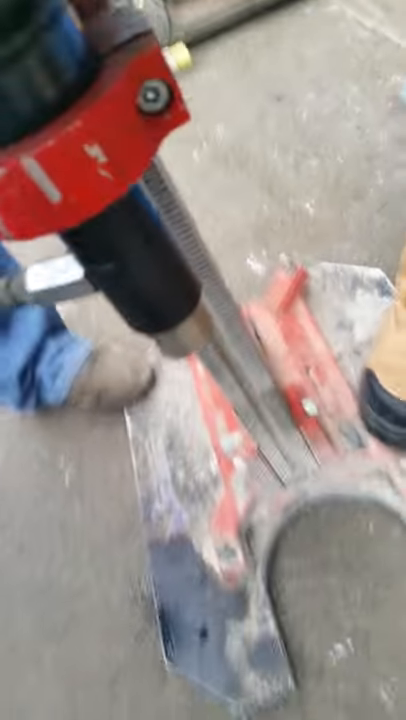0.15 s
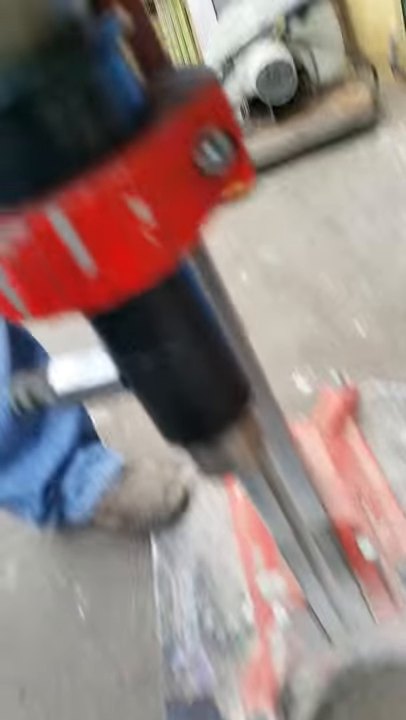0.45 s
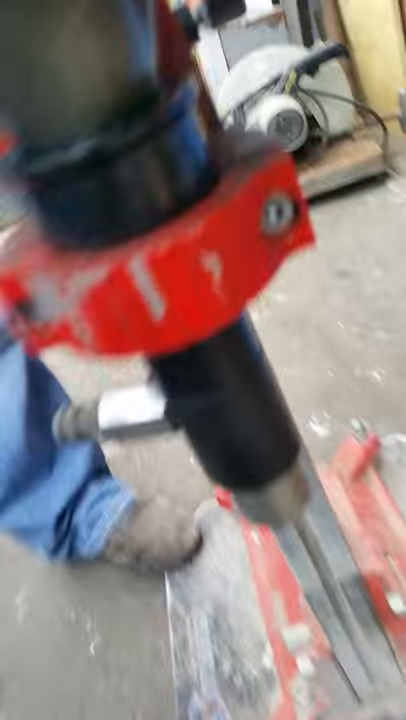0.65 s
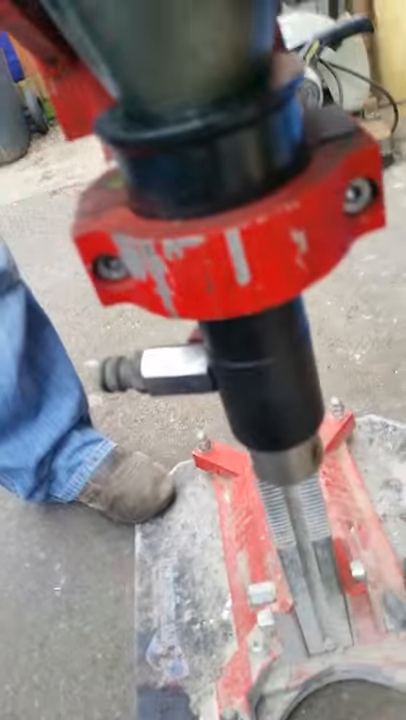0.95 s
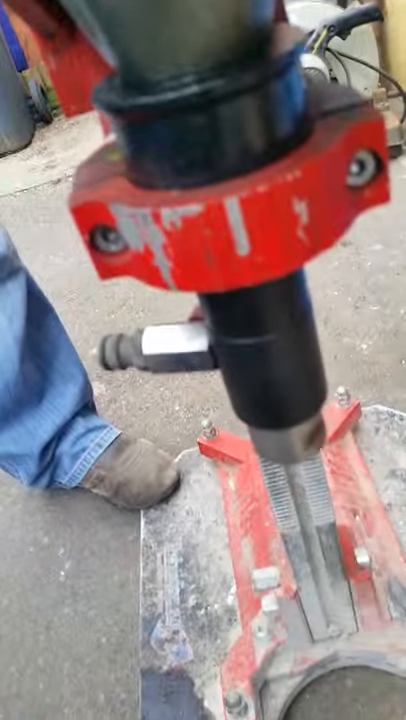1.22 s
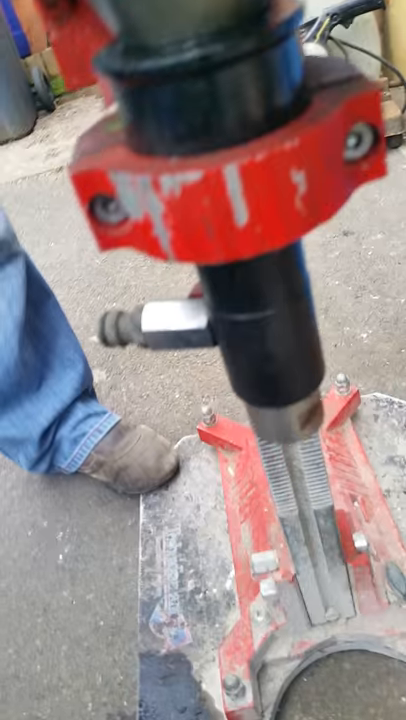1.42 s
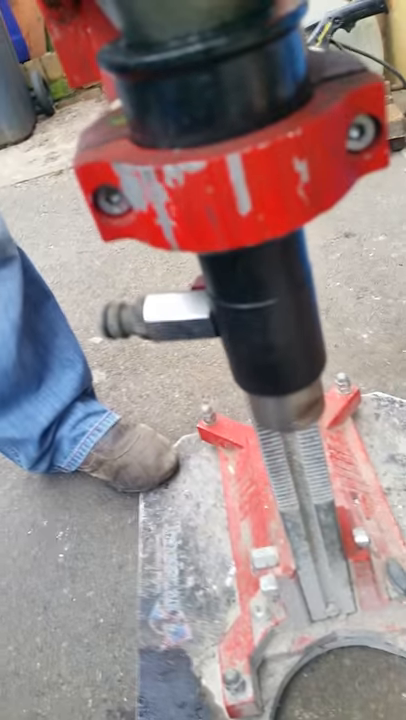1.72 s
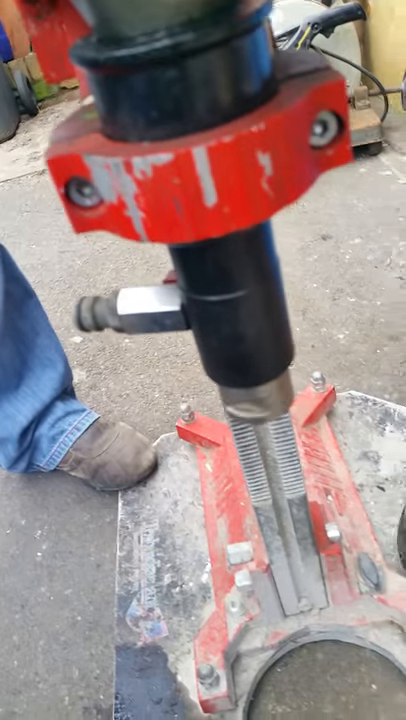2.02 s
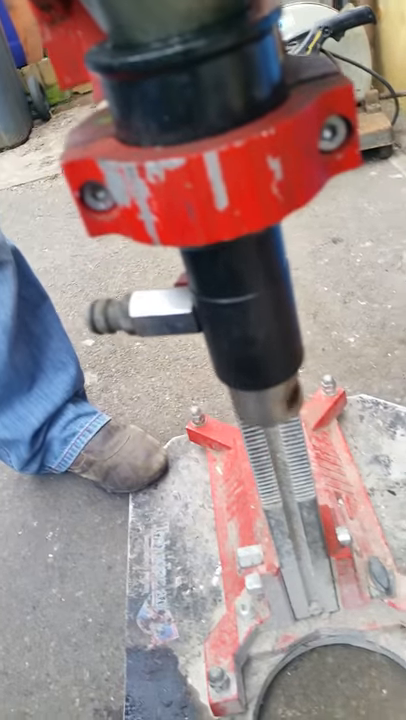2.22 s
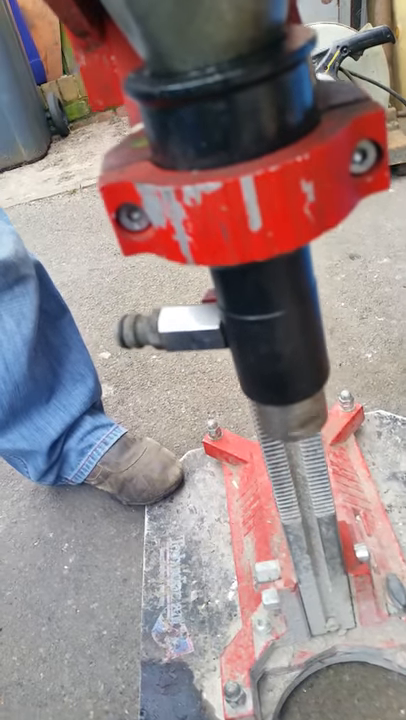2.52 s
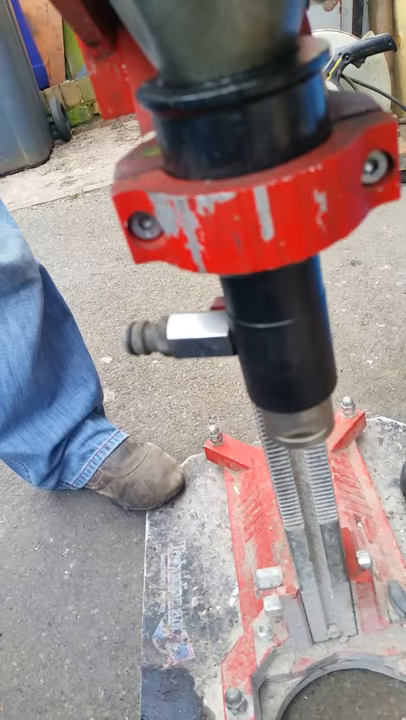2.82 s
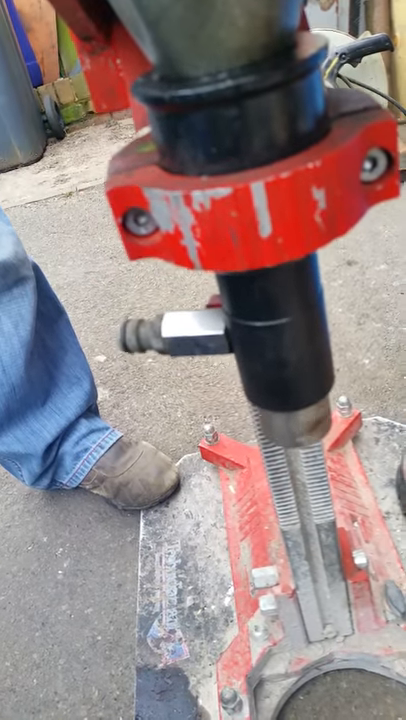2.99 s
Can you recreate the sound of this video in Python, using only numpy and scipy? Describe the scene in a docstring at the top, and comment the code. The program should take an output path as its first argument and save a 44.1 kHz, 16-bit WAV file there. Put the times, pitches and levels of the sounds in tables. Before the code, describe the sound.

A small two-stroke petrol engine on a core drill stand idles close by outdoors on pavement, rough and rapid. Loose steel chatters and knocks in the first second, then the idle smooths and speeds up.

```python
"""A small two-stroke petrol engine idles on the stand of a core drill, close by, outdoors on pavement.
Most firings come two to four turns apart: each thumps, cracks and hisses; the turns between puff through the silencer.
In the first second the shaking makes loose steel on the stand chatter most, with hard knocks that ring its modes.
Near 1.5 s the spindle sings narrowly; from 1.7 s the idle speeds up, and the chatter then sinks.
Gas pushes ring the silencer filter, shaped noise makes the hiss, and random taps excite the steel."""
import sys
import numpy as np
from scipy import signal
from scipy.fft import rfft, irfft
from scipy.io import wavfile
from scipy.ndimage import uniform_filter1d

SR = 44100
rng = np.random.default_rng(int(sys.argv[2]) if len(sys.argv) > 2 else 0)


def master(y):
    """Save y as 16-bit WAV."""
    cut = np.clip(np.atleast_2d(y).T, -1, 1)
    pcm = np.round(cut * 32767)  # scale
    wavfile.write(sys.argv[1], SR, pcm.astype(np.int16))


N = 138915

# Firings of the engine. Each row: time in seconds, thump level in dB (before THUMP_DB),
# crack level in dB (before CRACK_DB).
FIRINGS = [(0.0177, -15.0, -20.0), (0.0768, -15.0, -20.0), (0.1357, -15.0, -19.0), (0.194, -16.0, -17.0),
           (0.2504, -18.0, -24.0), (0.3083, -15.0, -23.0), (0.3467, -14.0, -21.0), (0.3855, -15.0, -22.0),
           (0.405, -15.0, -14.0), (0.4432, -14.0, -21.0), (0.5011, -16.0, -20.0), (0.5392, -15.0, -16.0),
           (0.5769, -14.0, -23.0), (0.6336, -14.0, -23.0), (0.6525, -15.0, -16.0), (0.6902, -15.0, -26.0),
           (0.7288, -14.0, -19.0), (0.804, -13.0, -17.0), (0.8748, -17.0, -18.0), (0.9442, -19.0, -21.0),
           (0.9973, -21.0, -24.0), (1.0509, -19.0, -27.0), (1.1068, -18.0, -21.0), (1.1648, -19.0, -23.0),
           (1.2217, -19.0, -20.0), (1.2783, -17.0, -20.0), (1.3345, -19.0, -21.0), (1.3928, -18.0, -19.0),
           (1.4674, -17.0, -24.0), (1.524, -20.0, -21.0), (1.5809, -18.0, -22.0), (1.6371, -19.0, -21.0),
           (1.7126, -21.0, -21.0), (1.7688, -21.0, -24.0), (1.8059, -20.0, -22.0), (1.8589, -20.0, -23.0),
           (1.909, -18.0, -19.0), (1.9574, -18.0, -21.0), (2.005, -19.0, -21.0), (2.0517, -19.0, -20.0),
           (2.0988, -19.0, -22.0), (2.145, -19.0, -22.0), (2.1762, -17.0, -26.0), (2.2074, -18.0, -23.0),
           (2.2538, -15.0, -20.0), (2.2987, -17.0, -22.0), (2.329, -17.0, -21.0), (2.3738, -18.0, -19.0),
           (2.4176, -18.0, -22.0), (2.4627, -18.0, -18.0), (2.5076, -18.0, -22.0), (2.5538, -16.0, -22.0),
           (2.585, -17.0, -21.0), (2.6308, -18.0, -21.0), (2.6762, -19.0, -23.0), (2.7222, -17.0, -19.0),
           (2.7665, -16.0, -19.0), (2.8115, -15.0, -20.0), (2.8571, -17.0, -20.0), (2.9021, -16.0, -22.0),
           (2.9477, -17.0, -21.0), (2.9919, -16.0, -24.0), (3.022, -15.0, -26.0), (3.0668, -15.0, -23.0),
           (3.0966, -16.0, -25.0), (3.1423, -18.0, -20.0)]
# Crank speed. Each row: time in seconds, speed in turns per second.
CRANK_SPEED = [(0, 52), (.8, 55), (1.7, 53), (1.95, 62), (2.3, 66), (3.15, 67)]
# Strength of the unfired puffs. Each row: time in seconds, level in dB relative to PUFF_DB.
PUFF_LEVEL = [(0, 5.5), (.4, 7), (.85, 5.5), (1.15, 3), (1.7, 6), (2.1, 1.5), (2.7, 2.3), (3.15, 2.5)]
# Silencer response. Each row: frequency in Hz, gain in dB.
SILENCER = [(15, -66), (40, -7), (53, 4), (66, 10.5), (82, 4.5), (110, 2), (150, 2), (205, 3.5), (290, 1.5),
            (360, -4), (450, -1), (560, -0.5), (700, -4), (850, -6), (1100, -5), (1280, -23), (2000, -27.5),
            (6000, -51)]
# Echoes from the ground and the frame. Each row: delay in seconds, level in dB.
ECHOES = [(.0062, -18), (0.0109, -16.5)]
# Exhaust at the far (right) microphone against the near one. Each row: frequency in Hz, gain in dB.
FAR_MIC = [(60, -1), (150, -3.5), (250, -2.5), (380, 3.5), (520, -11), (700, 8), (950, 2), (1300, 8)]
# Colour of cracks and hiss at each microphone, before tilt. Each row: frequency in Hz, gain in dB.
HISS_LEFT = [(200, -6), (600, 3.5), (1000, -5), (1500, -0.5), (2500, -10.5), (3500, -6), (5800, -14.5),
             (7800, -9.5), (9200, -4.5), (10200, 4), (12200, -4.5), (14200, 1), (15700, -7)]
HISS_RIGHT = [(200, -2.5), (600, 4), (1000, 0.5), (1500, 2.5), (2500, -3), (3600, -1.5), (4700, 3.5),
              (5600, 3.5), (6400, 4), (7800, 2.5), (9200, 0), (10200, -3.5), (12800, -5), (15700, -3.5)]
# Treble gain of the cracks, above about 8.5 kHz. Each row: time in seconds, gain in dB.
CRACK_TREBLE = [(0, -4), (.85, -2), (1.1, 4), (1.9, 3), (3.15, 3)]
# Mechanical hiss, before shaking, grain and trim. Each row: time in seconds, level in dB.
WHIRR_LEVEL = [(0, -24.5), (.25, -26.5), (.45, -24.5), (.8, -23.5), (1, -28.5), (1.2, -30.5), (1.9, -30),
               (2.25, -28.5), (2.5, -30), (2.9, -29), (3.03, -25.5), (3.15, -29)]
# Extra colour of the mechanical hiss. Each row: frequency in Hz, gain in dB.
WHIRR_COLOUR = [(600, 2), (1200, 0), (2600, 1), (3500, -0.5), (5000, -0.5)]
# Ringing modes of two loose steel parts.
# Each row: frequency in Hz, t60 in seconds, left level in dB, right level in dB.
LOW_MODES = [(2693, 0.042, -8.5, -8.5), (4666, 0.031, -17.5, -3.5), (6194, 0.037, -9.5, 7),
             (6520, 0.028, -37, 6), (6840, 0.035, -32, 5), (7340, 0.037, -32, 2)]
HIGH_MODES = [(8650, 0.024, -21, -31), (10716, 0.035, 5.5, -3.5), (11230, .025, -23, -19),
              (11000, 0.017, -13, -16), (11670, .015, -6, -7)]
# Chatter of those parts, before CHATTER_TRIM_DB. Each row: time in seconds, level in dB.
LOW_CHATTER = [(0, -26), (.3, -30), (.48, -35), (.85, -29.5), (1.1, -39), (1.52, -32.5), (1.85, -33.5),
               (2.1, -43), (3.15, -37)]
HIGH_CHATTER = [(0, -30.5), (.28, -41), (.42, -28.5), (.65, -30), (.82, -27.5), (1, -43), (1.5, -43.5),
                (1.85, -35), (2.1, -47), (3.15, -40)]
# Hard knocks of the high-ringing and low-ringing part. Each row: time in seconds, level in dB.
HIGH_KNOCKS = [(.194, -15), (.4045, -9), (.539, -20), (.653, -11.5)]
LOW_KNOCKS = [(.442, -15.5), (.804, -16.5), (1.393, -24)]
# Ring of the spindle, before shaking. Each row: time in seconds, right-hand level in dB.
SING_LEVEL = [(0, -43), (.48, -25), (.6, -40), (.9, -32), (1.18, -37), (1.28, -24), (1.4, -45),
              (1.455, -12), (1.49, -33), (1.8, -32), (2.1, -50)]

# Exhaust: bangs, then puffs that come a little late in the turn
THUMP_DB, BANG_S = 36, 0.0004
PUFF_DB, PUFF_SCATTER_DB = 16.5, 0.7
PUFF_S, PUFF_EDGE_S, PUFF_LATE_S = 0.0022, 0.0002, 0.00054
# An unfired cylinder first sucks gas back; its level is relative to the puff
SUCK_DB, SUCK_LEAD_S, SUCK_S = -8.5, 0.00054, 0.00094
# Fresh charge sweeps the cylinder after each stroke; SWEEP_TURN is in turns
SWEEP_DB, SWEEP_TURN, SWEEP_S = -3, 0.15, 0.011
# The intake gulps air about half a turn after each stroke
INTAKE_DB, INTAKE_TURN, INTAKE_S, INTAKE_EDGE_S = 11.5, 0.561, 0.0017, 0.00027
TURN_JITTER_S = 0.0001
# Lags of the right microphone
THUMP_LAG_S, CRACK_LAG_S = 0.00047, 0.00041

CRACK_DB, CRACK_DELAY_S, CRACK_ATTACK_S, CRACK_DECAY_S = 2.5, 0.00023, 0.00075, 0.0029
CRACK_TAIL_DB, CRACK_TAIL_S, CRACK_TILT_DB_PER_OCTAVE = -12.5, 0.011, 1.64
# Gas leaks under compression just before a firing
LEAK_DB, LEAK_S = -19, 0.0039
LIKENESS = 0.53  # share of hiss power common to both sides

WHIRR_GRAIN_DB, WHIRR_TRIM_DB, WHIRR_TILT_DB_PER_OCTAVE = 3, 2.0, -0.3
# Each turn adds this swell to a steady 1; the shaking dies down after each firing
SHAKE_PULSE, SHAKE_DECAY_S, SHAKE_FADE_DB_PER_S = 0.69 * 0.73, 0.0057, 56

TICKS_PER_S, TICK_SPREAD_DB, CHATTER_TRIM_DB = 500, 6, 2.0
KNOCK_RISE_S = 0.0011
SING_HZ, SING_WIDTH_HZ, SING_LEFT_DB = 6160, 48.7, -26  # left is relative to right
YARD_DB, YARD_T60_S, YARD_LOW_HZ = -15, 0.32, 900
TOP_HZ = 15800


def undb(db):
    """Decibels to gain."""
    return 10 ** (np.asarray(db) / 20)


def curve(rows, t):
    """Straight lines through (seconds, value) rows."""
    return np.interp(t, *np.array(rows).T)


def colour(x, points, tilt_db=0):
    """Causal filter through (Hz, dB) points, tilted in dB per octave about 6 kHz."""
    size = 8192
    octave = np.log2(np.maximum(np.arange(size // 2 + 1) * SR / size, 1))
    hz, db = np.array(points).T
    gain_db = np.interp(octave, np.log2(hz), db) + tilt_db * (octave - np.log2(6000))
    # folding the cepstrum gives minimum phase
    cepstrum = irfft(np.log(undb(gain_db)))
    cepstrum[1:size // 2] *= 2
    cepstrum[size // 2 + 1:] = 0
    impulse = irfft(np.exp(rfft(cepstrum)))
    return signal.fftconvolve(x, impulse)[:N]


def late(x, lag_s):
    """Delay by a time in seconds."""
    return np.interp(np.arange(N) - lag_s * SR, np.arange(N), x, left=0)


def strikes(times, gains, shape):
    """One copy of a shape at each time."""
    x = np.zeros(N)
    np.add.at(x, np.clip((times * SR).astype(int), 0, N - 1), gains)
    return signal.fftconvolve(x, shape)[:N]


def push(length_s, edge_s):
    """A push of gas with ramped edges and unit area."""
    t = np.arange(SR // 64) / SR
    shape = np.clip(t / edge_s, 0, 1) - np.clip((t - length_s) / edge_s, 0, 1)
    return shape / shape.sum()


def ring(x, modes, rise_s=1e-6):
    """Decaying sine modes of struck steel, heard left and right."""
    t = np.arange(SR // 8) / SR
    body = np.zeros((2, len(t)))
    for hz, t60, left_db, right_db in modes:
        decay = np.exp(-np.log(1000) * t / t60)
        body += undb([[left_db], [right_db]]) * np.sin(2 * np.pi * hz * t) * decay
    return signal.fftconvolve(x[None], body * np.minimum(t / rise_s, 1), axes=1)[:, :N]


def hiss(envelope, tilt_db):
    """Turbulent noise under an envelope; it reaches the left microphone first."""
    shared, left, right = rng.standard_normal((3, N)) * envelope
    left = np.sqrt(LIKENESS) * shared + np.sqrt(1 - LIKENESS) * left
    right = np.sqrt(LIKENESS) * shared + np.sqrt(1 - LIKENESS) * right
    right = late(right, round(CRACK_LAG_S * SR) / SR)  # whole samples keep the treble
    return np.array([colour(left, HISS_LEFT, tilt_db), colour(right, HISS_RIGHT, tilt_db)])


def unfired_turns(fired):
    """The crank turns almost evenly between firings; these are the times of the turns without one."""
    turns = [np.zeros(1)]
    for a, b in zip(fired[:-1], fired[1:]):
        count = max(1, round((b - a) * curve(CRANK_SPEED, a)))
        turns.append(np.linspace(a, b, count + 1)[1:-1])
    turns = np.concatenate(turns)
    return turns + TURN_JITTER_S * rng.standard_normal(len(turns))


def shaking(t, fired, idle):
    """Shaking of the stand: it swells with each turn, fades after each firing and averages 1."""
    swell = np.exp(-t[:SR // 16] / SHAKE_DECAY_S)
    shake = 1 + strikes(np.concatenate([fired, idle]), SHAKE_PULSE, swell)
    since_firing = t - np.append(0, fired)[np.searchsorted(fired, t)]
    shake *= undb(-SHAKE_FADE_DB_PER_S * since_firing)
    return shake / shake.mean()


def yard(x):
    """Adds a faint, short scatter of the treble from the walls and clutter around."""
    t = np.arange(SR // 2) / SR
    decay = np.exp(-np.log(1000) * t / YARD_T60_S)
    tail = rng.standard_normal((2, len(t))) * decay * np.minimum(t / 0.015, 1)
    tail = signal.sosfilt(signal.butter(2, YARD_LOW_HZ, "high", fs=SR, output="sos"), tail)
    tail /= np.sqrt(np.sum(tail ** 2, axis=1, keepdims=True))
    return x + undb(YARD_DB) * signal.fftconvolve(x, tail, axes=1)[:, :N]


def sing(t):
    """The narrow ring of the spindle: a sine whose phase drifts at random."""
    drift = np.cumsum(rng.standard_normal(N)) * np.sqrt(2 * np.pi * SING_WIDTH_HZ / SR)
    tone = np.sin(2 * np.pi * SING_HZ * t + drift) * undb(curve(SING_LEVEL, t))
    return np.array([undb(SING_LEFT_DB) * tone, tone])


def knocks(rows, modes):
    """Now and then a loose part strikes hard and rings its modes."""
    times, db = np.array(rows).T
    return ring(strikes(times, undb(db), np.ones(1)), modes, KNOCK_RISE_S)


def chatter(t, shake, modes, levels):
    """A loose steel part is tapped at random, hardest just after each turn."""
    chance, size, sign = rng.random(N), rng.exponential(size=N), rng.choice([-1, 1], N)
    taps = (chance < TICKS_PER_S / SR) * sign * undb(TICK_SPREAD_DB * np.minimum(size, 3))
    x = ring(taps * shake, modes)
    return x / np.sqrt(np.mean(x ** 2)) * undb(curve(levels, t) + CHATTER_TRIM_DB)


def whirr(t, shake):
    """Grainy hiss of piston, chain and fan, swelling with each turn."""
    held = np.repeat(rng.standard_normal(N // 64 + 1), 64)  # one level per 64 samples
    grain = uniform_filter1d(held, size=32)[:N]
    level_db = curve(WHIRR_LEVEL, t) + WHIRR_GRAIN_DB * grain + WHIRR_TRIM_DB
    x = hiss(shake * undb(level_db), WHIRR_TILT_DB_PER_OCTAVE)
    return np.array([colour(side, WHIRR_COLOUR) for side in x])


def cracks(t, fired, crack_db):
    """Each firing lets out a faint leak, then a sharp spit of gas with a short tail."""
    age = t[:SR // 16]
    fall = np.maximum(age - CRACK_ATTACK_S, 0)
    tail = undb(CRACK_TAIL_DB) * np.exp(-fall / CRACK_TAIL_S)
    shape = np.minimum(age / CRACK_ATTACK_S, 1) * (np.exp(-fall / CRACK_DECAY_S) + tail)
    spit = strikes(fired + CRACK_DELAY_S, undb(CRACK_DB + crack_db), shape)
    leak_shape = np.sqrt(age / LEAK_S) * (age < LEAK_S)
    leak = strikes(fired + CRACK_DELAY_S - LEAK_S, undb(LEAK_DB), leak_shape)
    x = hiss(leak + spit, CRACK_TILT_DB_PER_OCTAVE)
    treble = signal.sosfiltfilt(signal.butter(2, 8500, "high", fs=SR, output="sos"), x)
    return x + (undb(curve(CRACK_TREBLE, t)) - 1) * treble


def exhaust(fired, thump_db, idle):
    """Short bangs, longer puffs and slow gulps of air ring the silencer and bounce off ground and frame."""
    scatter_db = PUFF_SCATTER_DB * rng.standard_normal(len(idle))
    puff_sizes = undb(PUFF_DB + curve(PUFF_LEVEL, idle) + scatter_db)
    turns = np.concatenate([fired, idle])
    turn_s = 1 / curve(CRANK_SPEED, turns)

    bangs = strikes(fired, undb(THUMP_DB + thump_db), push(BANG_S, BANG_S))
    puffs = strikes(idle + PUFF_LATE_S, puff_sizes, push(PUFF_S, PUFF_EDGE_S))
    sucks = strikes(idle - SUCK_LEAD_S, puff_sizes * undb(SUCK_DB), push(SUCK_S, PUFF_EDGE_S))
    sweeps = strikes(turns + SWEEP_TURN * turn_s, undb(SWEEP_DB), push(SWEEP_S, INTAKE_S))
    gulps = strikes(turns + INTAKE_TURN * turn_s, undb(INTAKE_DB), push(INTAKE_S, INTAKE_EDGE_S))

    x = colour(bangs + puffs - sucks + sweeps + gulps, SILENCER)
    x = x + sum(undb(db) * late(x, lag) for lag, db in ECHOES)
    return np.array([x, late(colour(x, FAR_MIC), THUMP_LAG_S)])


def scene():
    """Steel, hiss and exhaust, all timed by the turns of the crank save the hard knocks."""
    t = np.arange(N) / SR
    fired, thump_db, crack_db = np.array(FIRINGS).T
    idle = unfired_turns(fired)
    shake = shaking(t, fired, idle)
    steel = chatter(t, shake, LOW_MODES, LOW_CHATTER) + chatter(t, shake, HIGH_MODES, HIGH_CHATTER)
    steel = steel + knocks(HIGH_KNOCKS, HIGH_MODES) + knocks(LOW_KNOCKS, LOW_MODES)
    steel = steel + shake * sing(t)
    engine = exhaust(fired, thump_db, idle) + cracks(t, fired, crack_db) + whirr(t, shake)
    return yard(engine + steel)


def record(dry):
    """The recorder cuts the top with a steep low-pass."""
    return signal.sosfilt(signal.ellip(10, 0.2, 80, TOP_HZ, fs=SR, output="sos"), dry)


dry = scene()
out = record(dry)
master(out)
```